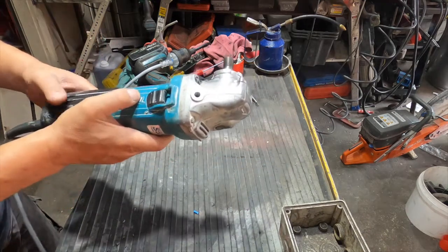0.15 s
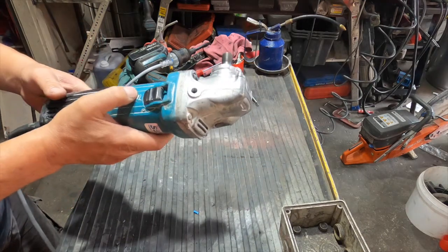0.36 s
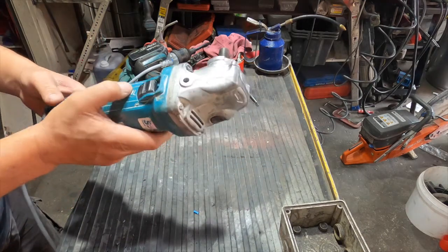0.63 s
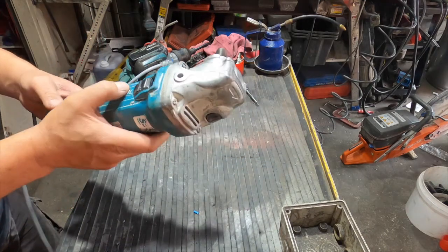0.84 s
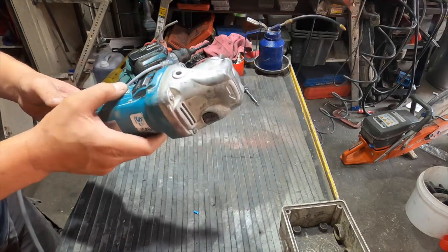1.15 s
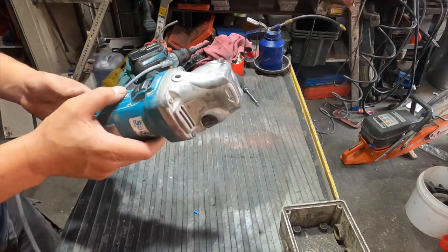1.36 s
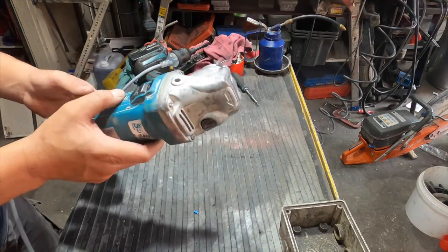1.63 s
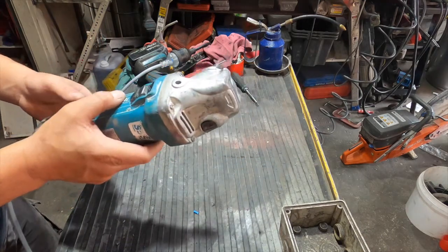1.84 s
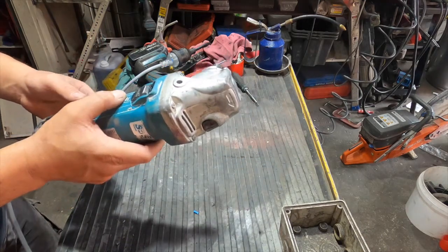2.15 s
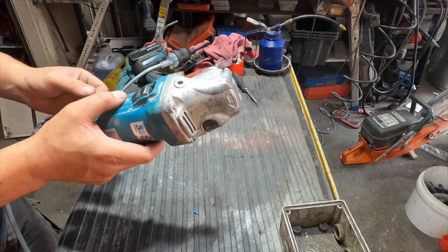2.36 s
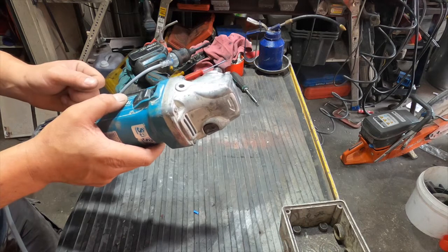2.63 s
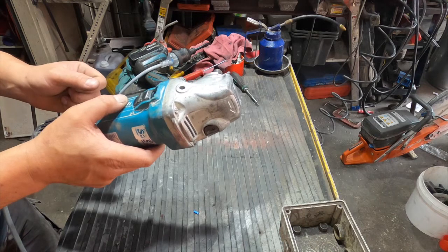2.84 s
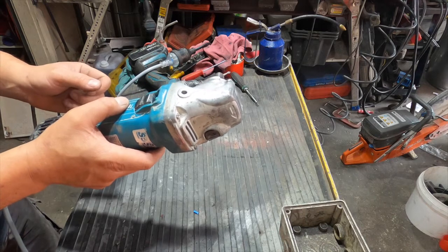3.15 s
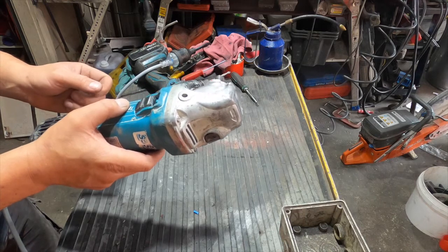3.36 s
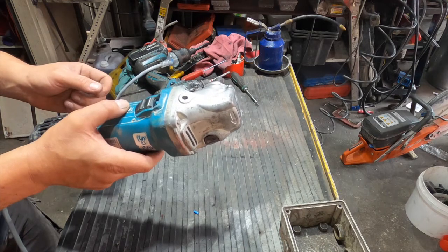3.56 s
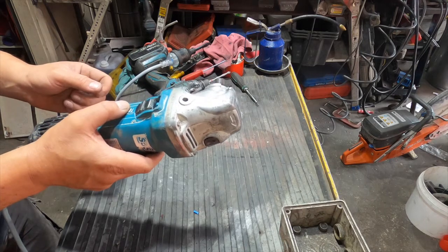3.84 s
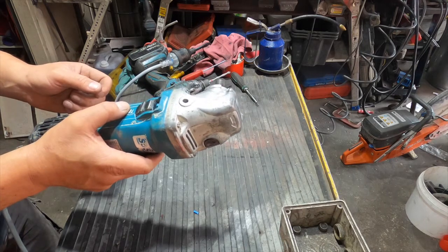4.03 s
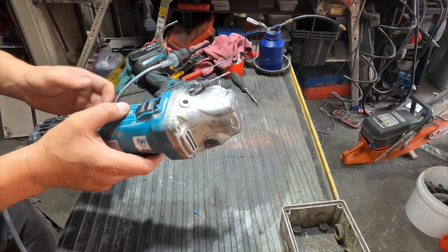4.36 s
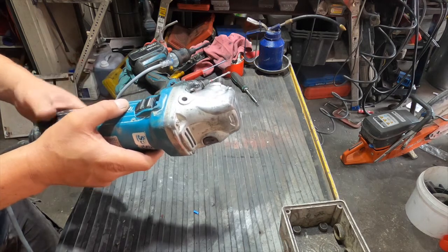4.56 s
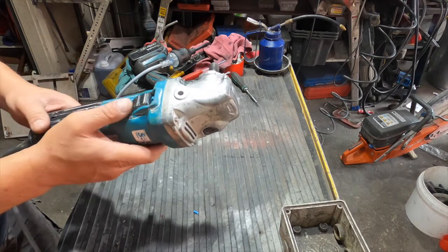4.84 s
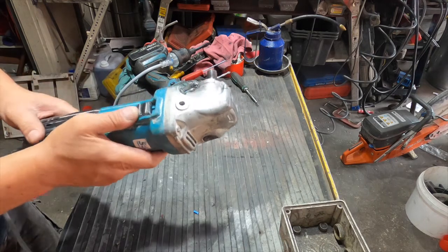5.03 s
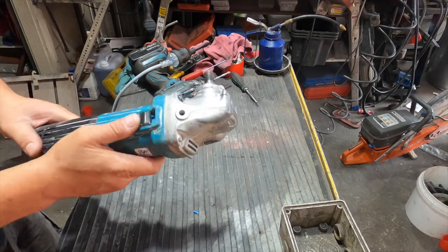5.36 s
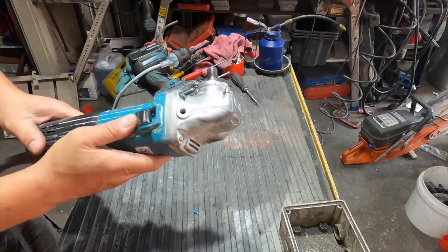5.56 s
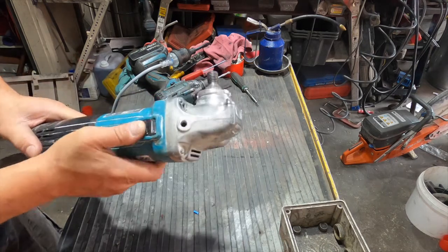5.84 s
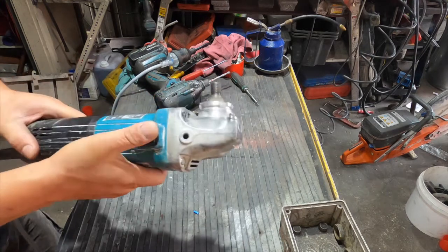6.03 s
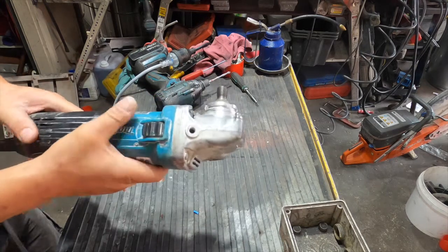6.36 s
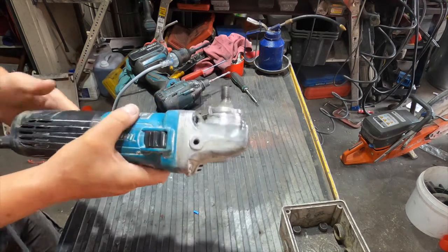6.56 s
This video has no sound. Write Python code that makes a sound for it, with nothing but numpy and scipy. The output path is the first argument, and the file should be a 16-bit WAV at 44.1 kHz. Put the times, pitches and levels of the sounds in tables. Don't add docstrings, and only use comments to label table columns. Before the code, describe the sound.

Close beside a bench, a bare electric grinder winds down over nearly five seconds: harsh metallic rattle, airy fan noise and descending tones. It ticks to rest, leaving soft room hiss, rumble, light handling and a distant bird. A hard plastic switch click then starts a buzzing, juddering growl that smooths into a fast rising whine, still running at the end. Mostly centred stereo, with slightly wider treble and little reverberation.

```python
import sys
import numpy as np
from scipy import signal
from scipy.fft import rfft, irfft, next_fast_len
from scipy.io import wavfile
from scipy.ndimage import uniform_filter1d

SR = 44100
rng = np.random.default_rng(int(sys.argv[2]) if len(sys.argv) > 2 else 0)


def invert_db(level):
    return 10 ** (np.asarray(level, dtype=float) / 20)


def dump(signal):
    limited = np.clip(np.atleast_2d(signal).T, -1, 1)
    pcm = np.round(limited * 32767).astype(np.int16)
    wavfile.write(sys.argv[1], SR, pcm)


N = 295470
TIME = np.arange(N) / SR
SIZE = next_fast_len(N + SR)
BINS_HZ = np.maximum(np.arange(SIZE // 2 + 1) * SR / SIZE, 1)

# time in seconds, turns per second.
SPEED_TURNS_PER_S = [(0, 492.0), (0.4, 426.0), (0.8, 365.0), (1.25, 305.2), (1.75, 249.0), (2.25, 199.3),
                     (2.75, 154.6), (3.25, 113.5), (3.75, 75.6), (4.25, 39.6), (4.86, 0.5), (5.93, 0.5),
                     (6.07, 54.0), (6.21, 125.0), (6.35, 199.5), (6.49, 281.5), (6.63, 379.8), (6.7, 427.0)]
RATTLE_EDGES_HZ = [250, 900, 3000, 7000, 15500]
# dB at 250 turns per second, dB per doubling of speed,
# knee of the fade in turns per second, dB under start load.
RATTLE_LAW_DB = [
    (-42.5, 4.5, 14, -42.5),
    (-24.5, 0.08, 91.7, -31),
    (-26, 2.9, 72, -32),
    (-40, 7, 11, -52),
]
# time in seconds, level in dB.
LOAD_DB = [(5.84, -48), (5.87, -17), (5.9, -17), (5.94, -1.5), (6.11, 3.5), (6.3, 0), (6.45, -14),
           (6.7, -22.5)]
# centre in Hz, width in Hz, level in dB.
HEAD_PEAKS_DB = [(1085, 170, -4), (1697, 13, -4), (2240, 240, -2), (2650, 28, 0), (3330, 360, -7),
                 (4420, 33, -10), (5320, 470, -15), (7290, 50, -23), (8030, 30, -21), (10100, 110, -40)]
# frequency in Hz, level in dB per Hz.
HEAD_FLOOR_DB = [(150, -43), (250, -21.5), (624, -19.5), (1030, -7), (1290, -11), (2610, -6.5), (2950, -14),
                 (3380, -6.5), (4020, -5), (4380, -2.5), (4780, -12), (5390, -10), (6750, -21.5),
                 (8020, -19), (15400, -78)]
# frequency in Hz, level in dB per Hz.
HEAD_TURNED_DB = [(150, -52), (250, -18.5), (297, -20), (525, -27), (692, -15.5), (1850, -9.5), (2570, -4),
                  (4310, -10), (7230, -25), (8590, -18.5), (15400, -40)]
# centre in Hz, width in Hz, level in dB.
HEAD_TURNED_PEAKS_DB = [(1000, 200, 3), (2560, 400, 4), (4400, 500, 10), (6550, 300, 4), (8600, 700, 8)]
# frequency in Hz, level in dB per Hz.
AIR_DB = [(150, -57.5), (250, -13), (378, -12.5), (582, -11), (851, -12.5), (1180, -2), (1760, -7),
          (2440, -3.5), (4540, -5), (5300, -5), (9050, -10.5), (13700, -27), (15400, -47)]
UNEVEN_MULTIPLES = [4, 8, 15, 16, 21, 26, 27, 32, 36, 40, 45, 48, 51]
UNEVEN_DB = [-38, -36, -39, -36, -33, -30, -24, -29, -27, -20, -18, -17, -21]
COASTING_PEAKS_DB = { 1: [(416, 64, -46.5), (381, 36, -44), (322, 43, -48.5), (240, 90, -53.5)],
                     3: [(1170, 230, -47), (970, 120, -50), (358, 110, -56.5)], 12: [(5130, 570, -37.5),
                     (3880, 350, -52), (2540, 200, -45), (1750, 600, -60)], 24: [(9000, 2500, -43),
                     (6780, 770, -35), (5880, 390, -34.5), (5050, 510, -30), (4390, 310, -29.5),
                     (3560, 790, -27), (2470, 500, -28.5), (2253, 266, -23)]}
STARTING_PEAKS_DB = { 1: [(270, 160, -53), (380, 160, -50)], 3: [(1230, 260, -44)], 12: [(2350, 300, -35),
                     (2800, 450, -28), (3250, 700, -24.5), (3950, 800, -30)], 24: [(3300, 700, -28),
                     (4400, 600, -33), (5150, 600, -38), (7500, 2000, -52)]}
# multiple, centre in Hz, width in Hz, level in dB.
SIDE_LINES_DB = [(27, 4450, 600, -39), (27, 7000, 1200, -47), (37, 7000, 800, -48), (45, 8800, 2200, -50),
                 (48, 9500, 2200, -53), (21, 4500, 700, -40), (48, 2350, 600, -46), (40, 8400, 900, -54),
                 (51, 8600, 1600, -54), (29, 4150, 500, -42), (26, 2250, 400, -39)]
# time in seconds, deep level in dB, upper level in dB.
RUMBLE_BED_DB = [(0, -72, -49), (2.2, -54, -53), (3.6, -54.5, -51), (4.6, -46, -56.5), (5.6, -54, -60.5),
                 (6.7, -58, -49)]
# centre in seconds, length in seconds, level in dB.
SWELLS_DB = [(.82, 0.073, -40.5), (1.34, 0.047, -47), (1.7, 0.047, -48), (1.96, 0.027, -55),
             (2.31, .12, -59), (2.51, 0.07, -47), (2.67, 0.076, -43), (3.17, 0.15, -47), (3.37, 0.114, -48),
             (3.8, .3, -48.5), (4.2, 0.45, -43), (4.6, 0.41, -49), (5.18, 0.24, -39.5), (5.75, 0.27, -41.5),
             (6.23, 0.38, -45)]
# frequency in Hz, level in dB per Hz.
DEEP_DB = [(12, -50), (20, -17), (38, -6), (54, 2), (70, 8), (83, 5), (113, -12), (130, -5), (170, -32),
           (290, -120)]
# frequency in Hz, level in dB per Hz.
UPPER_DB = [(53, -10), (90, -7.5), (113, -4.5), (178, -4.5), (205, -9), (265, -24.5), (300, -27),
            (390, -32), (660, -120)]
# frequency in Hz, level in dB per Hz.
HISS_SHAPE_DB = [(180, -28), (300, -8), (337, -7), (384, -6), (630, -13.5), (684, -8.5), (807, -19),
                 (1070, -9.5), (2920, -11), (3280, -11.5), (7860, -25.5), (9740, -21.5), (15400, -43)]
# frequency in Hz, level in dB.
DRONE_DB = [(102.0, -46), (144.0, -54), (171.0, -47)]
# time in seconds, peak in dB, pitch in Hz.
TICKS_DB = [(4.6588, -31, 2650), (4.6917, -35, 2620), (4.7117, -38, 2220), (4.7326, -40, 2330),
            (4.7601, -42, 2580), (4.8469, -39, 2800), (4.8963, -45, 3490), (4.9347, -47, 3480),
            (5.0494, -50, 1080), (5.3854, -48, 5400), (5.472, -48, 3800), (5.7139, -52, 1510),
            (5.7483, -41, 1330), (5.7615, -46, 5000), (5.7785, -42, 1460)]
# centre in seconds, length in seconds, level in dB.
RUBS_DB = [(4.9, .12, -63), (5.36, .16, -67), (5.6, .2, -69), (5.765, .06, -62)]
# start in seconds, length in seconds, pitch in Hz, level in dB.
BIRD_DB = [(4.9, .03, 3500, -66), (4.935, .05, 3490, -60), (5.065, .03, 3700, -69), (5.09, .05, 4230, -65),
           (5.115, .06, 3170, -62), (5.24, .025, 3350, -68), (5.55, .05, 3800, -69)]
# time in seconds, peak in dB.
SWITCH_DB = [
    (5.7915, -36),
    (5.7933, -36),
    (5.7958, -15),
    (5.7973, -14),
    (5.7990, -22),
]
# frequency in Hz, level in dB, t60 in seconds.
SWITCH_MODES_DB = [(1060, -26, .008), (1520, -35.5, .008), (2340, -45, .008), (2960, -30, 0.0022),
                   (3720, 3, 0.0076), (4900, -5.5, 0.0084), (5940, -7, 0.0031), (8560, -8.5, 0.007)]
# time in seconds, knock in dB over the rattle, hum in dB.
CURRENT_DB = [(5.83, 0, -40), (5.86, 0, -8), (5.92, 10, -2), (6.08, 10, 0), (6.2, 4, 0), (6.3, -1, -2),
              (6.5, -8, -8), (6.7, -12, -14)]
# frequency in Hz, level in dB.
HUM_DB = [(200.5, -55), (301.0, -50), (400.5, -50), (502, -57), (701.0, -51), (802.1, -58), (902.4, -54),
          (1050, -54)]
# frequency in Hz, side minus mid in dB.
WIDTH_DB = [(60, -15), (110, -14), (200, -15), (380, -13), (700, -12), (1290, -14), (2380, -10), (4400, -7),
            (8120, -2), (15000, -1)]
# frequency in Hz, left minus right in dB.
LEAN_DB = [(60, 0.5), (110, 1), (200, 0.5), (380, 1.5), (700, -1), (1290, 0), (2380, 2.5), (4400, 0.5),
           (8120, -0.5), (15000, -12.5)]

FADE_POWER = 1.37
DIP_S, DIP_LENGTH_S, DIP_DB = 6.48, 0.11, -6.5
LINE_FLUTTER_DB, THROB_SHARP = 1.5, 2.4
PULSE_HZ, FIRST_PULSE_S = 100.5, 5.9655
HISS_DB, SWELL_UPPER_DB, UPPER_PATCHY_DB = -67, -14.5, 1.5
SHED_HZ, SHED_WIDTH_HZ, SHED_DB = 71, 16, 15
TICK_DB = 4
SHOP_T60_S, SHOP_DB = 0.21, -11


def rms_one(x):
    return x / np.sqrt(np.mean(x ** 2) + 1e-20)


def in_time(rows):
    s, *columns = np.transpose(rows)
    return [np.interp(TIME, s, column) for column in columns]


def at_hz(points, hz):
    points = np.array(points)
    return np.interp(np.log(hz), np.log(points[:, 0]), points[:, 1])


def colour(x, db):
    cepstrum = irfft(np.log(invert_db(db)), SIZE)
    cepstrum[1:SIZE // 2] *= 2
    cepstrum[SIZE // 2 + 1:] = 0
    return irfft(rfft(x, SIZE) * np.exp(rfft(cepstrum)), SIZE)[..., :N]


def band_pass(x, order, low_hz, high_hz):
    return signal.sosfilt(signal.butter(order, [low_hz, high_hz], "band", fs=SR, output="sos"), x)


def ring(clicks, hz, t60_s):
    r, w = invert_db(-60 / (t60_s * SR)), 2 * np.pi * hz / SR
    return signal.lfilter([0, np.sin(w)], [1, -2 * r * np.cos(w), r * r], clicks + 1e-18)


def drift(rate_hz):
    knots = rng.standard_normal(int(40 * N / SR) + 2)
    return np.interp(TIME * min(rate_hz, 40), np.arange(len(knots)), knots)


def hump(s, length_s):
    return np.exp(-np.minimum((2 * (TIME - s) / length_s) ** 2, 30))


def resonance(hz, centre_hz, width_hz):
    return 1 / (1 + (2 * (hz - centre_hz) / width_hz) ** 2)


def head_db(peak_db):
    bumps = sum(resonance(BINS_HZ, hz, width_hz) for hz, width_hz, _ in HEAD_PEAKS_DB)
    return at_hz(HEAD_FLOOR_DB, BINS_HZ) + peak_db * np.minimum(bumps, 1)


def turned_head_db():
    bumps = sum(db * resonance(BINS_HZ, hz, width_hz) for hz, width_hz, db in HEAD_TURNED_PEAKS_DB)
    return at_hz(HEAD_TURNED_DB, BINS_HZ) + bumps


def rattle_levels(turns_per_s):
    load_db = np.where(TIME > LOAD_DB[0][0], in_time(LOAD_DB)[0], -120)
    dip = invert_db(DIP_DB * hump(DIP_S, DIP_LENGTH_S))
    levels = []
    for db, slope_db, knee, loaded_db in RATTLE_LAW_DB:
        fade_db = 10 * FADE_POWER * np.log10(1 + (knee / turns_per_s) ** 2)
        free_db = db + slope_db * np.log2(turns_per_s / 250) - fade_db
        levels.append(np.hypot(invert_db(free_db), invert_db(loaded_db + load_db)) * dip)
    return levels


def tooth_contacts(turns_per_s, angle):
    hits_per_s = 200 + 14 * turns_per_s
    sizes = invert_db(2.4 * np.minimum(rng.exponential(1, N), 4)) * (rng.random(N) < hits_per_s / SR)
    grit = rms_one(signal.lfilter([1], [1, -.9], sizes) * np.sqrt(SR / hits_per_s))
    contact = (.7 * grit + .55) * rng.standard_normal((2, N))
    contact *= invert_db(drift(7) + drift(35))
    growth = np.minimum((turns_per_s / 160) ** 2.5, 2.2)
    for multiple, db in zip(UNEVEN_MULTIPLES, UNEVEN_DB):
        audible = (turns_per_s * multiple < SR / 3) * (TIME < 5)
        tone = np.sin(2 * np.pi * (multiple * angle + rng.random())) * audible
        contact += invert_db(db + 8 + 2.5 * drift(5)) * growth * tone
    return contact


def rattle(turns_per_s, angle):
    contact = tooth_contacts(turns_per_s, angle)
    turned = TIME > 5.5
    gears = colour(contact * ~turned, head_db(peak_db=5.5))
    gears += colour((contact + 2.5 * knocks()) * turned, turned_head_db())
    air = (turns_per_s / 250) ** 1.22 * colour(rng.standard_normal((2, N)), at_hz(AIR_DB, BINS_HZ))
    out = 0
    for low_hz, high_hz, level in zip(RATTLE_EDGES_HZ, RATTLE_EDGES_HZ[1:], rattle_levels(turns_per_s)):
        band = band_pass(gears + air, 3, low_hz, high_hz)
        running_rms = np.sqrt(uniform_filter1d(band[0] ** 2, size=SR // 5) + 1e-12)
        out = out + level * band / running_rms
    return out


def swept(peaks, hz):
    return np.sqrt(sum(invert_db(2 * db) * resonance(hz, centre_hz, width_hz) ** 2
                       for centre_hz, width_hz, db in peaks))


def whine(turns_per_s, angle):
    powered, pulse = TIME > 5.9, mains_pulse(THROB_SHARP)
    throb = [1, 1, np.where(powered, 4 * pulse, 1.2), np.where(powered, .2 + 3.4 * pulse, 1.1)]
    out = np.zeros(N)
    for k, gain in zip(COASTING_PEAKS_DB, throb):
        hz = k * turns_per_s
        height = np.where(powered, swept(STARTING_PEAKS_DB[k], hz), swept(COASTING_PEAKS_DB[k], hz))
        out += gain * height * invert_db(LINE_FLUTTER_DB * drift(30)) * np.sin(2 * np.pi * k * angle)
    for k, *peak in SIDE_LINES_DB:
        out += ~powered * swept([peak], k * turns_per_s) * np.sin(2 * np.pi * k * angle)
    stopping = turns_per_s ** 2 / (turns_per_s ** 2 + 32 ** 2)
    return np.sqrt(2) * stopping * out


def background():
    deep_db, upper_db = in_time(RUMBLE_BED_DB)
    swells = np.sqrt(sum(invert_db(2 * db) * hump(s, length_s) for s, length_s, db in SWELLS_DB))
    shed_db = SHED_DB * resonance(BINS_HZ, SHED_HZ, SHED_WIDTH_HZ)
    shapes = at_hz(DEEP_DB, BINS_HZ) + shed_db, at_hz(UPPER_DB, BINS_HZ), at_hz(HISS_SHAPE_DB, BINS_HZ)
    deep, upper, hiss = (rms_one(colour(rng.standard_normal((2, N)), db)) for db in shapes)
    deep /= np.sqrt(uniform_filter1d(deep[0] ** 2, size=SR // 8))
    upper *= np.hypot(invert_db(upper_db + UPPER_PATCHY_DB * drift(12)), invert_db(SWELL_UPPER_DB) * swells)
    hiss *= invert_db(HISS_DB + 1 + drift(7))
    drone_db = np.interp(TIME, [2.6, 3.4, 4.25, 4.6], [-20, -7, -5, -26])
    drone = sum(invert_db(db + drone_db + 2.0 * drift(4)) * np.sin(2 * np.pi * hz * TIME + 0.7 * drift(5))
                for hz, db in DRONE_DB)
    return np.hypot(invert_db(deep_db), swells) * deep + upper + hiss + drone


def ticks():
    out = np.zeros(N)
    decay = np.exp(-np.arange(800) / 40.0)
    for s, db, hz in TICKS_DB:
        at = int(s * SR)
        burst = rng.standard_normal(800) * decay
        level = invert_db(db + TICK_DB * (s > 4.8))
        out[at:at + 800] += level * (.4 * burst + .2 * ring(burst, hz, .003))
    return band_pass(out, 2, 1000, 6500)


def rubs():
    grain = rng.standard_normal(N) * invert_db(3.2 * drift(43))
    noise = rms_one(band_pass(grain, 2, 1000, 5000))
    return noise * sum(invert_db(db) * hump(s, length_s) for s, length_s, db in RUBS_DB)


def bird():
    out = np.zeros(N)
    for s, length_s, hz, db in BIRD_DB:
        t = np.arange(int(length_s * SR)) / SR
        whistle = np.sin(np.pi * t / length_s) * np.sin(2 * np.pi * hz * t)
        out[int(s * SR):][:len(t)] += invert_db(db + 1.5) * whistle
    return out


def switch():
    at = [int(s * SR) for s, _ in SWITCH_DB]
    peaks_db = np.array(SWITCH_DB)[:, 1]
    out = np.zeros(N)
    for hz, level_db, t60_s in SWITCH_MODES_DB:
        clicks = np.zeros(N)
        clicks[at] = invert_db(peaks_db + level_db - 6 + rng.normal(0, 2.0, len(at)))
        out += ring(clicks, hz, t60_s)
    return band_pass(out, 3, 900, 10500)


def mains_pulse(sharp):
    return np.exp(sharp * (np.cos(2 * np.pi * PULSE_HZ * (TIME - FIRST_PULSE_S)) - 1))


def knocks():
    knock_db = in_time(CURRENT_DB)[0]
    chance = rng.standard_normal((90, 2))
    at_s = FIRST_PULSE_S - .001 + np.arange(-10, 80) / PULSE_HZ + 0.00014 * chance[:, 0]
    clicks = np.zeros(2 * N)
    clicks[(at_s * SR).astype(int)] = invert_db(1.2 * chance[:, 1])
    clicks = clicks[:N]
    burst = signal.lfilter([1], [1, -2 * .955, .955 ** 2], clicks) / 9.5
    return invert_db(knock_db) * (4.0 * clicks + .7 * burst * rng.choice([-1, 1], (2, N)))


def hum():
    hum_db = np.where(TIME > CURRENT_DB[0][0], in_time(CURRENT_DB)[1], -120)
    buzz = sum(invert_db(db + 2.5 * drift(12)) * np.sin(2 * np.pi * (hz * TIME + rng.random()))
               for hz, db in HUM_DB)
    return np.sqrt(2) * invert_db(hum_db) * buzz


def workshop(direct, scattered):
    t = np.arange(SR // 2) / SR
    tail = rng.standard_normal(len(t)) * invert_db(-60 * t / SHOP_T60_S) * (t > .004)
    tail = rms_one(tail) / np.sqrt(len(t))
    mid = direct + invert_db(SHOP_DB) * signal.fftconvolve(direct, tail)[:N]
    side = colour(scattered, np.minimum(at_hz(WIDTH_DB, BINS_HZ) - 1, 0))
    lean_db = at_hz(LEAN_DB, BINS_HZ) / 2
    return np.array([colour(mid + side, lean_db), colour(mid - side, -lean_db)])


def scene():
    turns_per_s = in_time(SPEED_TURNS_PER_S)[0]
    angle = np.cumsum(turns_per_s) / SR
    direct, scattered = rattle(turns_per_s, angle) + background()
    clear = whine(turns_per_s, angle) + ticks() + rubs() + bird() + switch() + hum()
    echo = rms_one(rng.standard_normal(600) * np.exp(-np.arange(600) / 150)) / np.sqrt(600)
    return workshop(direct + clear, scattered + signal.fftconvolve(clear, echo)[:N])


def low_pass(x):
    return signal.sosfilt(signal.butter(12, 15600, fs=SR, output="sos"), x)


def record(dry):
    mix = 0.97 * np.tanh(dry / 0.84)
    return low_pass(mix)


dry = scene()
out = record(dry)
dump(out)
```